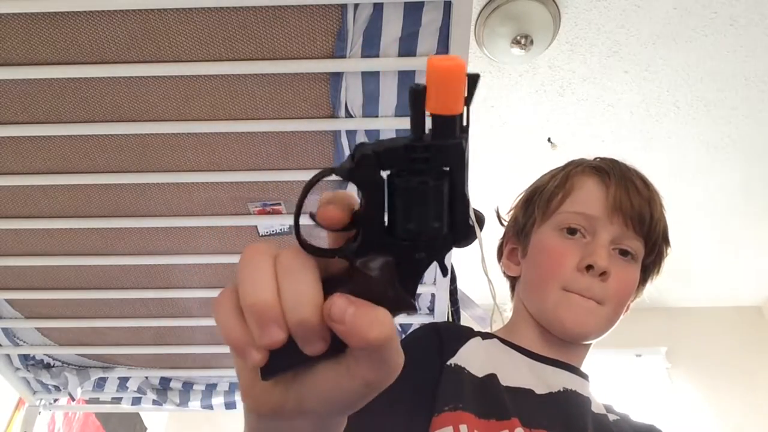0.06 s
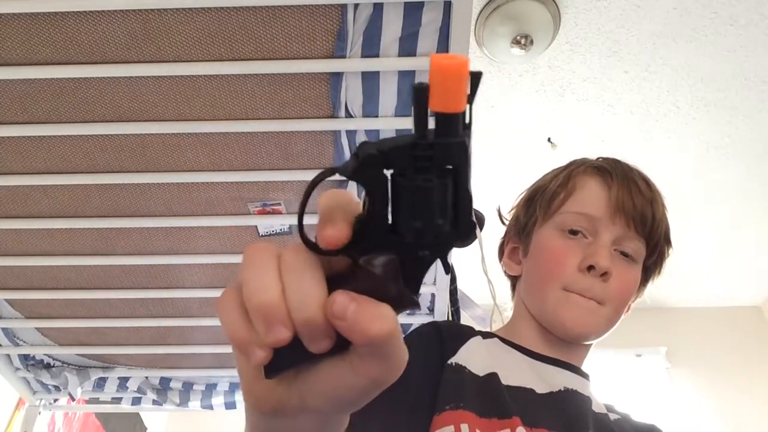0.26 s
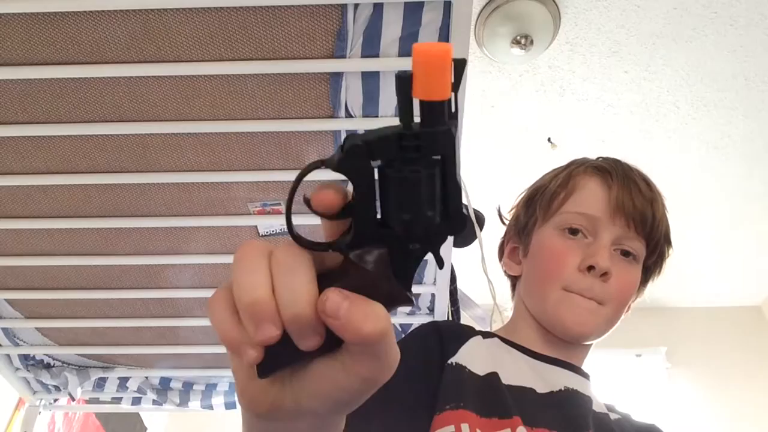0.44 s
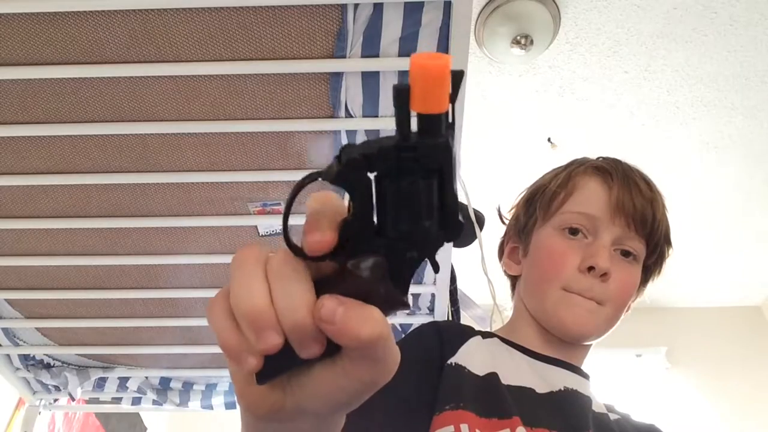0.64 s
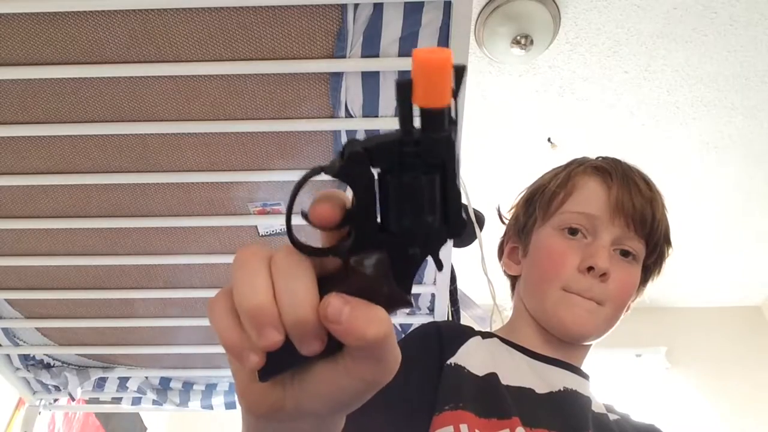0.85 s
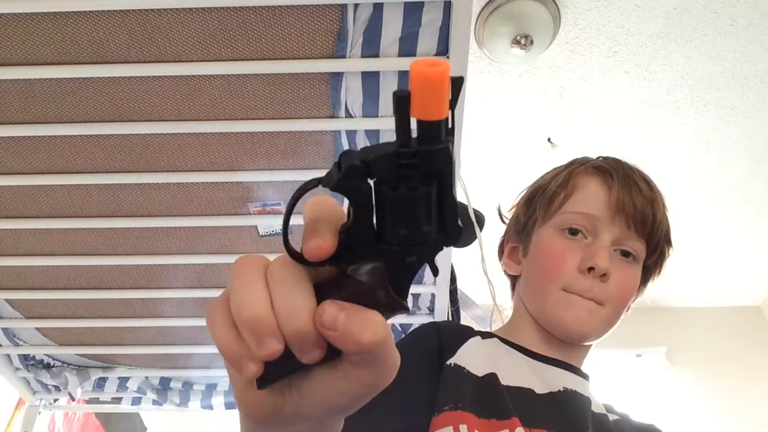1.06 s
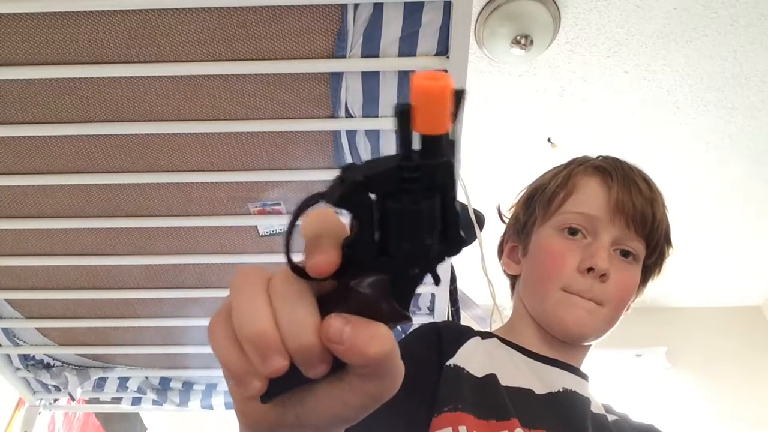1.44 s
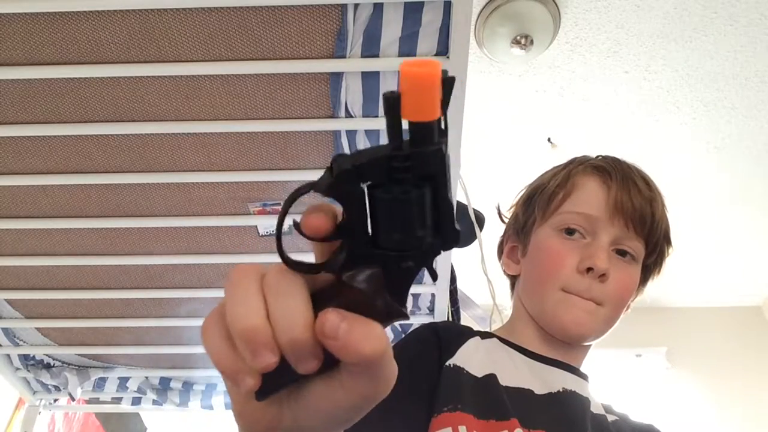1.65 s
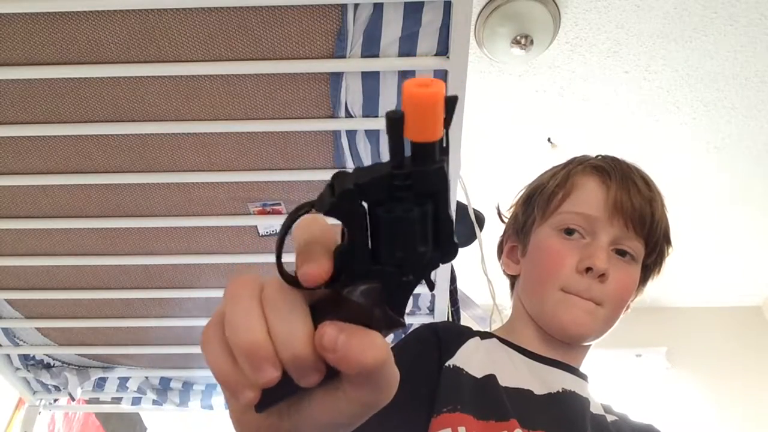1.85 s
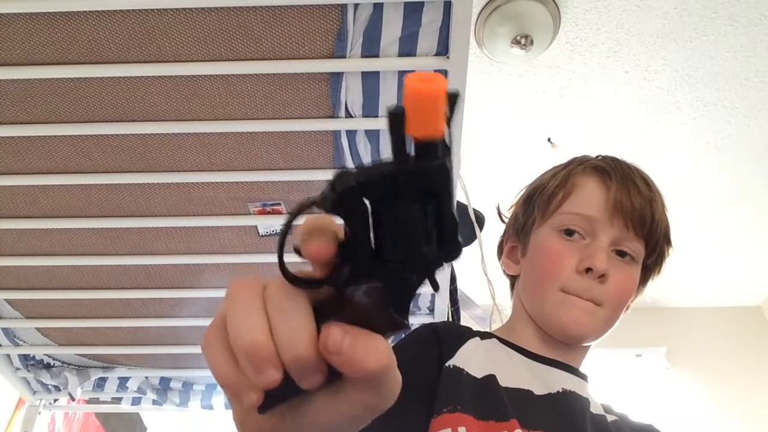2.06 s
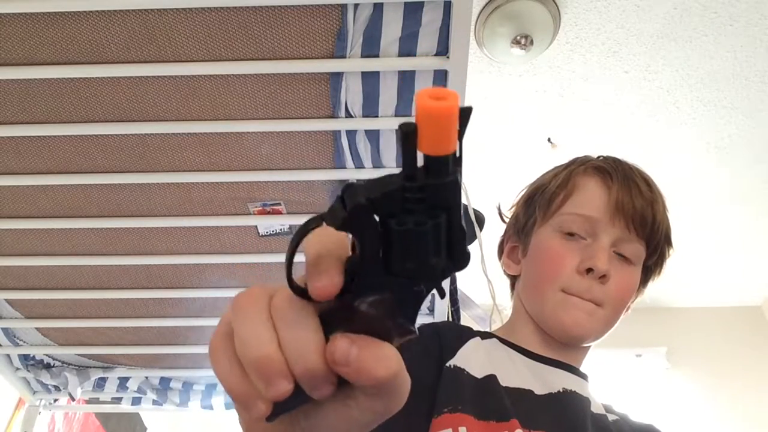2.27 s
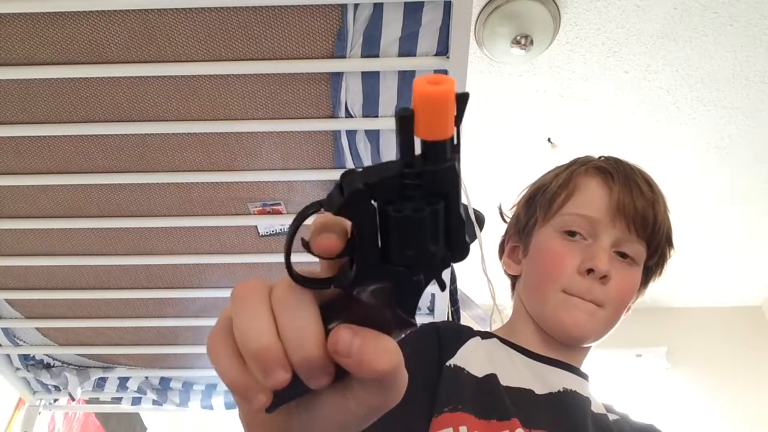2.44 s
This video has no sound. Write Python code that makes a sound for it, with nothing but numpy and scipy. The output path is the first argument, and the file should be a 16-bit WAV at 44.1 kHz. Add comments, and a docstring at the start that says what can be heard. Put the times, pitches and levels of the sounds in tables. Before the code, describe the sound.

A toy cap revolver fires close by, with sharp bangs at about 0.2, 0.6 and 1.0 seconds, each ringing briefly in a small, quiet room. At 1.4 and 1.9 seconds the hammer falls with only a plastic snap. A last bang comes at 2.3 seconds. Faint ticks of the turning cylinder run between shots, and the trigger springs back with a light knock about 0.2 seconds after each one.

```python
"""Toy cap gun in a bedroom

A plastic cap revolver is fired six times, close to the microphone. Four caps go off with a crack
that fills the small room; twice the hammer falls with only a snap. A small catch (the pawl) ticks
as it turns the cylinder, and after each pull the trigger springs back with a knock.
The microphone thins the bass and rounds off the loudest peaks."""
import sys
import numpy as np
from scipy import signal
from scipy.fft import rfft, irfft
from scipy.io import wavfile

SR = 44100
rng = np.random.default_rng(int(sys.argv[2]) if len(sys.argv) > 2 else 0)


def dump_mix(stems):
    """Bounce the given channels to the path in sys.argv[1] as a 16-bit WAV at rate SR."""
    frames = np.atleast_2d(stems).T  # one column per channel
    limited = np.clip(frames, -1, 1)  # hard clip at full scale
    pcm = np.round(limited * 32767).astype(np.int16)
    wavfile.write(sys.argv[1], SR, pcm)


N = 114660
AGE = np.arange(SR // 2) / SR  # seconds since a sound began

# Tone of the room's steady hush: f/Hz, level/dB
HUSH_TONE = [(30, 8), (80, 0), (140, -3), (220, -4), (300, -1.5), (400, -6), (650, -10), (880, -4),
             (1200, -11), (1600, -9), (2200, -15.5), (3000, -8.5), (3800, -15), (4800, -9.5), (6000, -20),
             (10000, -26.5), (16000, -33.5)]
# How long the room rings (t60 is the time to fade by 60 dB): f/Hz, t60/s
ROOM_DECAY = [(150, 0.6), (400, 0.24), (900, .27), (2000, 0.26), (4500, 0.24), (8000, .2), (15000, .17)]
# Ticks of the pawl: t/s, level/dB, cylinder ring relative to the tick/dB
PAWL_TICKS = [(.071, -41.5, -4), (0.111, -57.5, -17), (0.1773, -52, -3), (0.1925, -20, -11),
              (0.199, -19.5, -11.5), (0.3759, -23, -13), (0.4994, -43.5, -2.5), (0.6189, -30, -11),
              (0.7963, -24.5, -11), (0.8308, -33, -15), (0.8914, -55, 2), (0.9967, -51, -11),
              (1.0197, -35.5, -11.5), (1.192, -24, -21.5), (1.3091, -51, -22), (1.4274, -17.5, -7),
              (1.5836, -38.5, -16), (1.6022, -43, -11), (1.6053, -21, -9), (1.6252, -20, -21),
              (1.7362, -38.5, -5), (1.8067, -52, -14.5), (1.8864, -31, -5), (2.036, -36, -32.5),
              (2.06, -21, -14), (2.2644, -32.5, -15), (2.4517, -24.5, -25)]
# Tone of plastic hitting plastic: f/Hz, level/dB
CONTACT_TONE = [(300, -5), (1200, -16), (2800, 0.5), (5000, 9.5), (7000, -5.5), (9500, -6), (12500, -3.5),
                (16000, -7)]
# Ringing notes of the plastic frame: f/Hz, level/dB, ring time as a share of the longest
FRAME_NOTES = [(1200, -27.5, 0.77), (2650, -18.5, 0.71), (3050, -15.5, 0.45), (3540, -16.5, .8),
               (4650, -10.5, 1), (4730, -4, 1), (5750, -19.5, 0.3), (6320, -11.5, 0.83), (6800, -20, .7),
               (7500, -18.5, 1), (8940, -8, 0.39), (9580, -15.5, 0.77), (11000, -19, 0.58),
               (15500, -24, .4)]
# Ringing notes of the hollow cylinder: f/Hz, level/dB, t60/s
CYLINDER_NOTES = [(1700, -8.5, 0.005), (2650, -3.5, 0.011), (3050, -0.5, 0.0083)]
# Tone of the room after a click: f/Hz, level/dB
CLICK_TAIL_TONE = [(100, -16), (300, -10), (900, -4.5), (1500, -7.5), (2200, -9.5), (3000, 4), (3800, 0),
                   (4800, 3), (5600, -7), (6700, -0.5), (9000, -4), (12000, -11.5), (16000, -10.5)]
# Caps that go off: t/s, crack level/dB, room level/dB
CAP_SHOTS = [(0.2007, 3, 0), (0.6217, 0.5, 0), (1.0215, 1.5, 0.5), (2.2665, 2, -0.5)]
# Tone of a cap's crack: f/Hz, level/dB
CRACK_TONE = [(100, -12), (250, 7), (600, -2.5), (1100, -0.5), (2100, -2.5), (3500, -3.5), (5500, -10),
              (8500, -5), (12000, -9.5), (16000, -15)]
# Tone of the room after a bang: f/Hz, level/dB
WASH_TONE = [(100, -12.5), (170, 0), (280, -0.5), (450, -3), (750, 0.5), (1200, 1.5), (2100, 0.5),
             (3100, -1), (4500, -2.5), (6200, -8), (8500, -4.5), (12000, -15), (16000, -22.5)]
# Standing waves, the pitches the room favours: f/Hz, boost/dB
ROOM_NOTES = [(787, 6), (1062, 8.5), (1329, 2), (1453, 1), (1672, 6), (1883, 4.5), (2046, 3.5), (2105, 7.5),
              (2366, 5), (2516, 2.5), (3000, 3), (3127, 5), (4096, 8), (7509, 5), (8504, 8)]
# Strong early echoes of a bang: delay/s, level/dB
ECHOES = [(0.0123, -10), (0.0156, -1), (0.0165, -2), (.0283, -8), (0.0326, -1.5), (0.0421, -11)]
# The trigger springs back: t/s, thump level/dB, thump length/s, click level/dB, tail level/dB
TRIGGER_RETURNS = [(0.4098, -4.5, 0.0011, -13.5, -1), (0.8343, -13, 0.0015, -17, -2.5),
                   (1.222, 2, 0.00093, -14.5, 0.5), (1.6273, -8.5, 0.0025, -14, -0.5),
                   (2.0894, -2.5, 0.0035, -12, 0), (2.4933, -17.5, 0.0017, -15.5, -1.5)]
# The hammer falls with no bang:
# t/s, thump level/dB, thump length/s, clack level/dB, knock level/dB, tail level/dB
EMPTY_SHOTS = [(1.4297, 8, 0.0011, 1, -28.5, 3.5), (1.8886, 12, .0005, -7.5, -5, 1.5)]
# Tone of the hammer's clack: f/Hz, level/dB
CLACK_TONE = [(300, 3), (800, -5), (1500, -6.5), (2400, 5.5), (3400, -8.5), (4400, 2), (5300, -1),
              (7000, -2.5), (9300, -2), (11000, -6.5), (12800, -7.5), (16000, -6)]
# Hollow knock of the body under the hammer: f/Hz, level/dB, t60/s
BODY_NOTES = [(784, 1, 0.0096), (1050, -3.5, 0.0068), (2350, -1, .006)]
# Ringing notes of the spring behind the hammer: f/Hz, level/dB, t60/s
HAMMER_SPRING_NOTES = [(2783, -40.5, 0.15), (2770, -42.5, .15), (12700, -46, .13)]
# Tone of the room after the hammer's snap: f/Hz, level/dB
SNAP_TAIL_TONE = [(200, -11), (500, -14), (900, -5), (1400, -13), (2400, -9.5), (2650, 2), (2790, 6.5),
                  (3000, 2), (3800, 0.5), (4700, 3), (5400, -8.5), (6500, 4.5), (7500, -3.5), (9200, -0.5),
                  (11200, -8.5), (12700, -2.5), (14000, -18.5), (16000, -15)]


def from_db(db):
    """Turn decibels into a number to multiply by."""
    return 10 ** (np.asarray(db) / 20)


def at_hz(table, hz):
    """Read between a table's rows, with every octave equally wide."""
    freqs, values = np.transpose(table)
    return np.interp(np.log(np.maximum(hz, 1)), np.log(freqs), values)


def fade(t60, hold_s=0):
    """Stay at full level for hold_s, then fall by 60 dB every t60 seconds."""
    return 1000 ** (-np.maximum(AGE - hold_s, 0) / t60)


def add(track, start_s, sound):
    """Mix a sound into the track at the given time."""
    i = max(int(round(start_s * SR)), 0)
    track[i:i + len(sound)] += sound[:len(track) - i]


def noise(tone, size=len(AGE)):
    """Noise with the given tone, scaled to a strength (rms) of 1."""
    gains = from_db(at_hz(tone, np.fft.rfftfreq(size, 1 / SR)))
    x = irfft(rfft(rng.standard_normal(size)) * gains, size)
    return x / x.std()


def by_band(x, loudness):
    """Let each half octave rise and fall along its own curve, loudness(hz)."""
    centres = np.geomspace(62.5, 16000, 17)
    spectrum, freqs = rfft(x), np.fft.rfftfreq(len(x), 1 / SR)
    return sum(irfft(spectrum * at_hz(np.c_[centres, centres == hz], freqs), len(x)) * loudness(hz)
               for hz in centres)


def ring(notes, spread_db=2):
    """Short fading notes, each a little stronger or weaker from hit to hit."""
    return sum(from_db(db + spread_db * rng.standard_normal()) * rng.choice([-1, 1])
               * np.sin(2 * np.pi * hz * AGE) * fade(t60) for hz, db, t60 in notes)


def room_hush():
    """The quiet room gives a faint, steady noise."""
    return from_db(-67) * noise(HUSH_TONE, size=N)


def click(grit_db=0, longest_t60=0.018):
    """Plastic parts meet: a gritty contact and a short ring of the frame."""
    detune = 1 + 0.0075 * rng.standard_normal()  # the grip shifts the pitch a little
    notes = [(hz * detune, db, longest_t60 * share) for hz, db, share in FRAME_NOTES]
    grit = from_db(-8.5 + grit_db) * noise(CONTACT_TONE) * fade(t60=0.012)
    return grit + from_db(-3.5) * ring(notes)


def room_tail(tone, decay_scale=0.86, rise_s=0.008):
    """A short sound bounces around the room and lingers as a soft blur."""
    tail = by_band(noise(tone), lambda hz: fade(decay_scale * at_hz(ROOM_DECAY, hz)))
    return tail * np.minimum(AGE / rise_s, 1)


def pawl():
    """The pawl ticks as it turns the hollow cylinder; its touch is lighter than the trigger's."""
    out = np.zeros(N)
    room = from_db(-36) * room_tail(CLICK_TAIL_TONE)
    for start_s, db, cylinder_db in PAWL_TICKS:
        tick = click(grit_db=-4.5) + from_db(cylinder_db) * ring(CYLINDER_NOTES)
        add(out, start_s, from_db(db) * (tick + room))
    return out


def thump(db, length_s):
    """A single push of air that dies away quickly."""
    return from_db(db) * np.exp(-AGE / length_s)


def standing_waves(x, width_hz=18):
    """Boost the narrow pitches at which the room rings, then scale to a strength of 1."""
    freqs = np.fft.rfftfreq(len(x), 1 / SR)
    boost_db = sum(db / (1 + ((freqs - hz) / width_hz) ** 2) for hz, db in ROOM_NOTES)
    x = irfft(rfft(x) * from_db(boost_db), len(x))
    return x / x.std()


def room_swell(hz, onset_s=0.0069, rise_s=0.018, drop_s=0.021):
    """The room's sound builds, stays level for about 40 ms, steps down and dies away."""
    rise = np.clip((AGE - onset_s) / rise_s, 0, 1)
    # near 1 for low notes, which start fading slightly sooner and step down further, then linger faintly
    bass = 1 / (1 + (hz / 344) ** 4)
    hold_s = 0.043 - 0.002 * bass
    drop_db = (3.5 + 12 * bass) * np.clip((AGE - hold_s) / drop_s, 0, 1)
    return rise * fade(at_hz(ROOM_DECAY, hz), hold_s) * from_db(-drop_db)


def caps(shared_part=0.44):
    """Each cap cracks, a quick echo bounces off the floor or ceiling, then more echoes fill the room."""
    out = np.zeros(N)
    shared = np.sqrt(shared_part) * noise(WASH_TONE)  # this part stays the same from shot to shot
    for start_s, crack_db, room_db in CAP_SHOTS:
        crack = from_db(-10 + crack_db) * noise(CRACK_TONE) * fade(t60=0.037, hold_s=0.003)
        blast = thump(db=-18.5, length_s=0.0007)
        fresh = np.sqrt(1 - shared_part) * noise(WASH_TONE)
        wash = from_db(-14 + room_db) * by_band(standing_waves(shared + fresh), room_swell)
        add(out, start_s, crack + blast + wash)
        first_bounce = ring([(1350, -5, 0.004)])  # f/Hz, level/dB, t60/s
        add(out, start_s + 0.0022, first_bounce)
        for delay_s, echo_db in ECHOES:
            slap = from_db(-10 + echo_db) * noise(CRACK_TONE) * fade(t60=0.0038)
            add(out, start_s + delay_s, slap + thump(echo_db + room_db, length_s=0.0018))
    return out


def trigger_spring():
    """The trigger's spring hums briefly after a jolt."""
    return ring([(890, -36.5, 0.062)])  # f/Hz, level/dB, t60/s


def trigger():
    """The released trigger knocks back against its stop."""
    out = np.zeros(N)
    for start_s, thump_db, thump_s, click_db, tail_db in TRIGGER_RETURNS:
        tail = from_db(-47) * room_tail(CLICK_TAIL_TONE) + trigger_spring()
        knock = thump(thump_db, thump_s) + from_db(click_db) * click()
        add(out, start_s, knock + from_db(tail_db) * tail)
    return out


def hammer(rise_s=0.00031):
    """With no bang, the hammer thumps and clacks on the hollow body and sets the springs ringing."""
    out = np.zeros(N)
    for start_s, thump_db, thump_s, clack_db, knock_db, tail_db in EMPTY_SHOTS:
        push = thump(thump_db, thump_s) * (1 - np.exp(-AGE / rise_s))
        clack = from_db(-3 + clack_db) * noise(CLACK_TONE) * fade(t60=0.015)
        room = from_db(-33.5) * room_tail(SNAP_TAIL_TONE, decay_scale=0.93)
        tail = room + ring(HAMMER_SPRING_NOTES) + trigger_spring()
        knock = from_db(knock_db) * ring(BODY_NOTES)
        add(out, start_s, push + clack + knock + from_db(tail_db) * tail)
    return out


def scene():
    """All the revolver's sounds over the room's hush, in one channel."""
    return (caps() + hammer() + pawl() + trigger() + room_hush())[None]


def record(dry):
    """The microphone cuts the bass, rounds the peaks unevenly and drops the highest treble."""
    low_cut_hz, high_cut_hz, ceiling = 172, 15800, 0.93
    # a bass cut this steep rings briefly after each thump
    x = signal.sosfilt(signal.butter(4, low_cut_hz, "high", fs=SR, output="sos"), dry)
    x = ceiling * np.tanh(x / ceiling)
    x = x - 0.13 * x ** 2  # the microphone gives way sooner on one side of the wave
    return signal.sosfilt(signal.ellip(10, 0.1, 70, high_cut_hz, fs=SR, output="sos"), x)


dry = scene()
out = record(dry)
dump_mix(out)
```